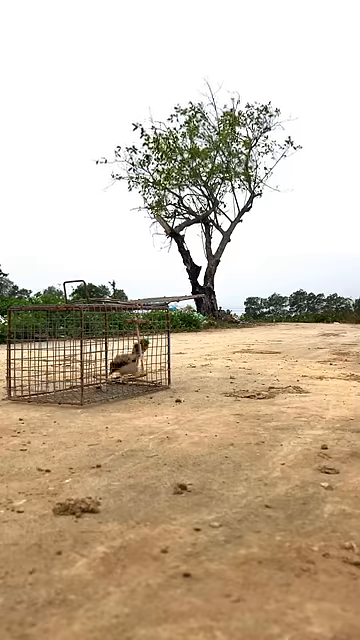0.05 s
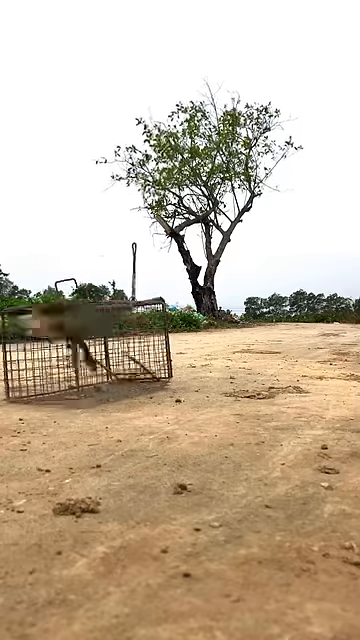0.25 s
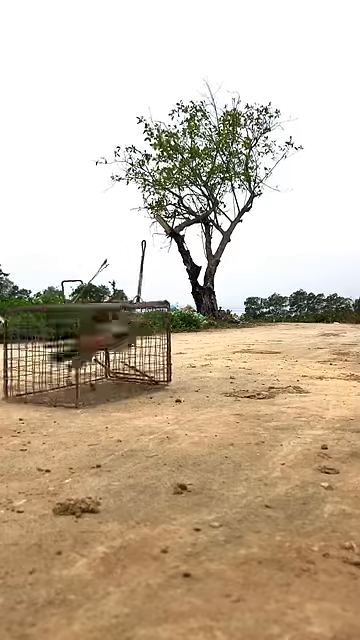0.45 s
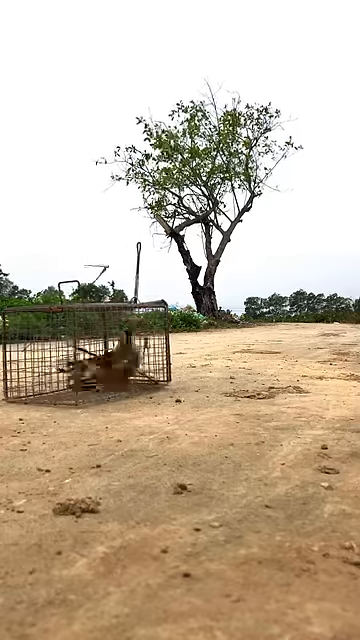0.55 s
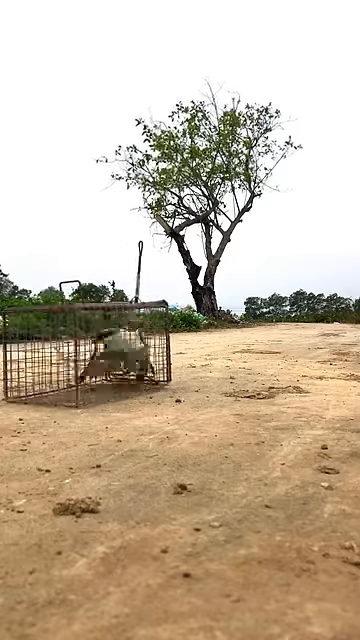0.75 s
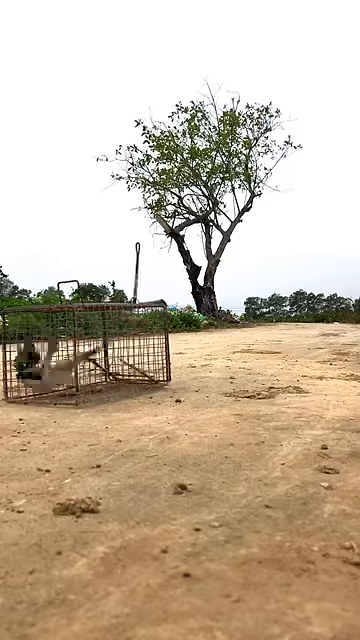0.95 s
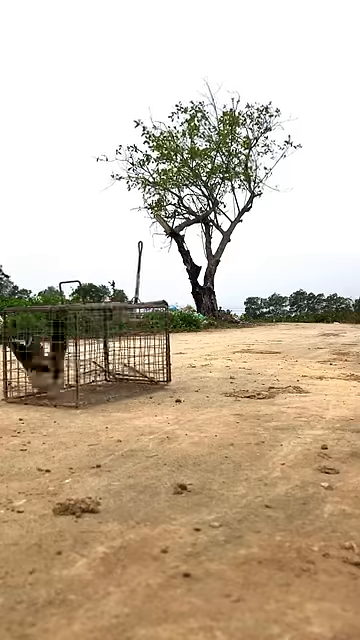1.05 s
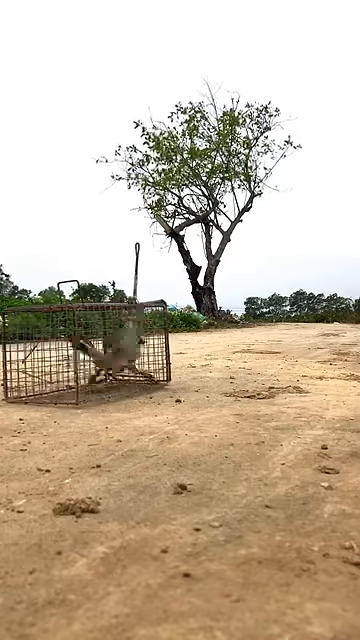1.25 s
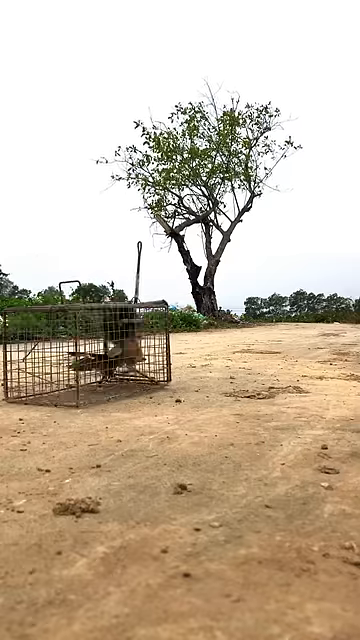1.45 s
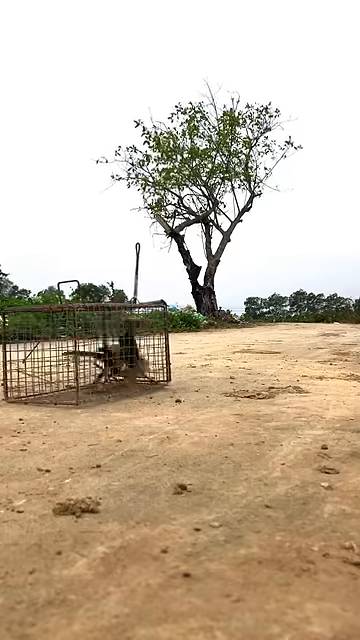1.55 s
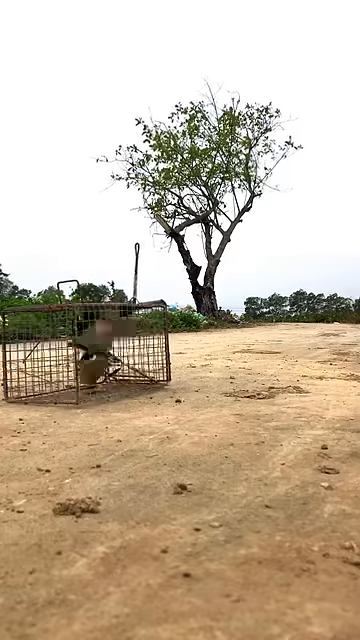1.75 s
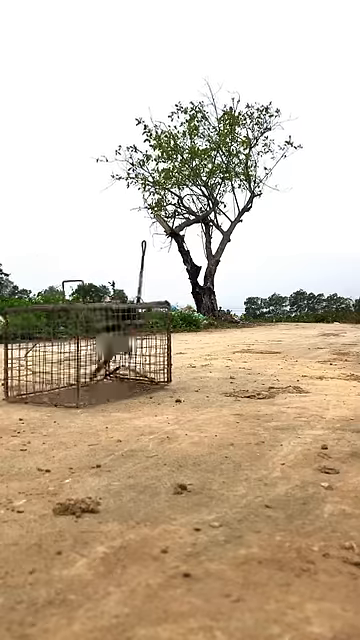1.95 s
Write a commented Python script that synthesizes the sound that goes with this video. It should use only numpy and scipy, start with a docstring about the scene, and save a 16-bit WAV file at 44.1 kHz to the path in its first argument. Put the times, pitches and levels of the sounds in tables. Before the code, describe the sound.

A wire cage trap door slams shut with a sharp metallic clack, then the mesh rattles outdoors

```python
"""Dry ground outdoors: a wire cage trap's latch slips, its door whips down, slams and bounces; a rod and a hook ping.
The caught animal then throws itself at the mesh. Blows and rattle are shaped noise plus mesh modes, pings are
decaying sines with a click, thumps are damped sines. Behind lie noise rumble and hiss, narrow-noise hums and
insects, and faint far tones. The level dips briefly near the start and fades back in."""
import sys
import numpy as np
from scipy import signal
from scipy.fft import rfft, irfft
from scipy.io import wavfile
from scipy.ndimage import uniform_filter1d

SR = 44100
rng = np.random.default_rng(int(sys.argv[2]) if len(sys.argv) > 2 else 0)


def store_pcm(level_fs):
    """Save levels as 16-bit WAV."""
    pcm = np.round(np.clip(level_fs, -1, 1) * 32767).astype(np.int16)
    wavfile.write(sys.argv[1], SR, np.atleast_2d(pcm).T)


N = 88200
T = np.arange(N) / SR
DIP_S = 0.0728
DETUNE = 0.008  # fraction of mode frequency


def amp(db):
    """Amplitude factor of a level in dB."""
    return 10 ** (np.asarray(db) / 20)


def evened(x):
    """Scales to RMS 1."""
    return x / np.sqrt(np.mean(x ** 2) + 1e-20)


def add(mix, start_s, sound):
    """Adds a sound in place, cut at the end of the mix."""
    part = mix[round(start_s * SR):][:len(sound)]
    part += sound[:len(part)]


def colour(x, points):
    """Filters by (frequency [Hz], level [dB]) points, -90 dB outside them, then scales to RMS 1."""
    hz = np.fft.rfftfreq(len(x), 1 / SR)
    point_hz, point_db = np.transpose(points)
    gain_db = np.interp(np.log(hz + 1), np.log(point_hz), point_db, -90, -90)
    return evened(irfft(rfft(x) * amp(gain_db), len(x)))


def band(x, lo_hz, hi_hz):
    """Butterworth band-pass, upper edge kept below Nyquist."""
    sos = signal.butter(3, [lo_hz, min(hi_hz, SR / 2.1)], "band", fs=SR, output="sos")
    return signal.sosfilt(sos, x)


def resonate(x, hz, width_hz):
    """Resonance at a fixed or moving hz: shift to 0 Hz, one-pole low-pass, shift back."""
    turn = np.exp(2j * np.pi * np.cumsum(hz * np.ones(len(x))) / SR)
    pole = np.exp(-np.pi * width_hz / SR)
    return 2 * (turn * signal.lfilter([1 - pole], [1, -pole], x / turn)).real


def ring(modes, extra_db, phase_turns, stretch):
    """Sum of exponentially decaying sines; stretch multiplies the mode frequencies."""
    t = T[:6000, None]
    hz, db, t60_s = np.transpose(modes)
    level = amp(db + extra_db - 60 * t / np.maximum(t60_s, .003))
    return (level * np.sin(2 * np.pi * (hz * stretch * t + phase_turns))).sum(1)


# rumble and hiss spectrum: (frequency [Hz], relative density [dB])
AIR_SPECTRUM = [(25, -38), (45, -1), (70, 0), (140, 2), (220, -10), (450, -11), (1000, -14.5), (2000, -21),
                (2700, -30), (4500, -51), (6500, -33.5), (8800, -35), (10000, -58), (16000, -42)]
# hums: (frequency [Hz], width [Hz], RMS level [dB])
HUM_BANDS = [(79, 5, -66), (104.7, 22, -57.5), (155.6, 9, -57.5)]
# insects: (frequency [Hz], width of each of two passes [Hz], RMS level before throb and late cut [dB])
INSECT_BANDS = [(6620, 340, -77.5), (7850, 400, -88)]
# far tones: (start [s], length [s], from [Hz], to [Hz], RMS waver [Hz], peak level [dB])
FAR_TONES = [(0.835, 0.19, 440.7, 448, 5.7, -54), (1.221, 0.29, 439, 448, 5.8, -66),
             (1.517, 0.223, 2910, 3100, 50, -65), (1.726, .03, 3310, 3450, 55, -72)]
AIR_DB, EARLY_MID_DB = -54, -37
INSECT_PULSE_HZ, INSECT_DEPTH, LATE_INSECT_DB = 24, 0.79, -4.5


def outdoors():
    """Shaped noise for air, resonated noise for hums and pulsing insects, gliding sines for far tones."""
    air_noise, hum_noise, insect_noise, waver_noise = rng.standard_normal((4, N))
    air = amp(AIR_DB) * colour(air_noise, AIR_SPECTRUM)
    mid_sos = signal.butter(2, [550, 3500], "band", fs=SR, output="sos")
    # middle band is quieter before the dip
    air -= (T < DIP_S) * (1 - amp(EARLY_MID_DB)) * signal.sosfiltfilt(mid_sos, air)
    out = air + sum(amp(db) * evened(resonate(hum_noise, hz, width_hz)) for hz, width_hz, db in HUM_BANDS)

    throb = 1 + INSECT_DEPTH * np.sin(2 * np.pi * INSECT_PULSE_HZ * T)
    throb *= amp(LATE_INSECT_DB * (T > DIP_S))
    for hz, width_hz, db in INSECT_BANDS:
        narrow = resonate(resonate(insect_noise, hz, width_hz), hz, width_hz)
        out += throb * amp(db) * evened(narrow)

    slow = evened(uniform_filter1d(uniform_filter1d(waver_noise, size=500), size=500))
    for start_s, length_s, from_hz, to_hz, waver_hz, db in FAR_TONES:
        progress = np.clip((T - start_s) / length_s, 0, 1)
        hz = from_hz + (to_hz - from_hz) * progress + waver_hz * slow
        out += amp(db) * np.sin(np.pi * progress) ** 0.36 * np.sin(2 * np.pi * np.cumsum(hz) / SR)
    return out


# thumps of the cage on the ground: (time [s], frequency [Hz], level at onset before attack [dB])
GROUND_THUMPS = [(0.208, 514, -36), (0.241, 358, -32), (0.446, 310, -36.5), (0.595, 334, -38)]
THUMP_T60_S, THUMP_ATTACK_S = 0.03, 0.0014


def thumps():
    """Dull thud: a quickly damped sine."""
    out, t = np.zeros(N), T[:4000]
    for start_s, hz, db in GROUND_THUMPS:
        level = amp(db - 60 * t / THUMP_T60_S) * np.minimum(t / THUMP_ATTACK_S, 1)
        add(out, start_s, level * np.sin(2 * np.pi * hz * t))
    return out


# mesh modes: (nominal frequency [Hz], relative level [dB], struck t60 [s])
MESH_MODES = [(2200, -1.5, 0.048), (3500, -5.5, .05), (3893, 1, 0.05), (4870, -2, 0.046), (6100, -5, .05),
              (6940, 3, 0.062), (7650, -5, 0.048), (8570, -8, 0.082), (10610, -3.5, 0.1),
              (12640, -2.5, .05), (13200, -4.5, 0.031), (14740, -9, 0.02)]
# frame spectrum: (frequency [Hz], relative density [dB])
FRAME_SPECTRUM = [(450, -22.5), (750, -8.5), (1400, -1.5), (2100, -0.5), (2700, -8.5), (3400, -14.5),
                  (4500, -36)]
# wire spectrum: (frequency [Hz], relative density [dB])
WIRE_SPECTRUM = [(2400, -27), (3000, -8), (4900, 0.5), (6000, 0), (10500, -7.5), (15300, -6), (16500, -15)]
# rattle RMS levels: (time [s], frame [dB], wire [dB], sizzle [dB])
SHAKE_LEVELS = [(0.095, -70, -84, -90.0), (0.144, -69, -79, -79.0), (0.148, -62, -46, -41),
                (0.185, -62, -54, -50), (0.203, -34.5, -44, -45), (0.222, -44.5, -37.5, -34),
                (0.244, -39, -32.5, -29), (0.265, -51.5, -37.5, -35), (0.289, -43.5, -38.5, -35.5),
                (0.33, -47, -42.5, -41.5), (0.385, -45, -48, -44), (0.42, -51.5, -47.5, -48),
                (0.45, -39, -44, -41.5), (0.475, -45.5, -51, -50), (0.499, -59.5, -62, -57),
                (0.51, -43.5, -53, -51), (0.535, -49, -48, -46), (0.578, -51.5, -61, -60.5),
                (0.604, -47.0, -46, -42.5), (0.635, -55.5, -53.5, -53.5), (0.68, -49, -47, -47),
                (0.71, -49.5, -50.5, -54.5), (0.77, -55, -51, -47.5), (0.81, -55, -57.5, -54.5),
                (0.9, -50.5, -53, -50), (0.926, -55.5, -53, -51), (0.93, -46, -43, -38),
                (0.97, -53.5, -52, -49), (1.01, -56, -61, -57), (1.034, -47.5, -50, -53.5),
                (1.059, -45.5, -45.5, -41.5), (1.105, -57.5, -48.5, -45.5), (1.154, -59.5, -52.5, -62),
                (1.189, -62, -62.0, -58), (1.23, -60.5, -64, -71), (1.26, -66, -80.5, -78.5),
                (1.41, -66, -89, -90), (1.47, -58.5, -70.5, -69), (1.499, -50.5, -49, -47.5),
                (1.53, -64, -57.0, -59), (1.55, -61, -57.5, -50.5), (1.62, -67, -62, -57),
                (1.66, -70, -80, -75), (1.78, -66, -72, -79), (1.797, -57, -57.5, -54.5),
                (1.84, -60.5, -55.5, -58.5), (1.9, -63.5, -63, -60.5), (1.94, -61.5, -73.0, -63.5),
                (2.0, -63, -70.0, -80)]
TICKS_PER_S, TICK_SPREAD_DB, TICK_T60_S = 2800, 0.5, 0.013
RATTLE_RING_DB, JANGLE_S = -7, .025


def rattle():
    """Dense wire-on-wire contacts drive frame, wire and mesh modes; each mode jangles on and off."""
    time_s, frame_db, wire_db, sizzle_db = np.transpose(SHAKE_LEVELS)
    ticks = amp(TICK_SPREAD_DB * np.minimum(rng.exponential(1, N), 4))
    ticks *= rng.random(N) < TICKS_PER_S / SR
    envelope = signal.lfilter([1], [1, -amp(-60 / SR / TICK_T60_S)], ticks)
    shake = envelope * rng.standard_normal(N)

    knots_s = np.arange(0, 2.1, JANGLE_S)
    chance = rng.standard_normal((len(MESH_MODES), 2, len(knots_s)))
    detune_step = (T / JANGLE_S).astype(int) // 3  # each detuning lasts three knots
    rung = np.zeros(N)
    for (hz, db, t60_s), (jangle, detune) in zip(MESH_MODES, chance):
        drive = shake * np.clip(np.interp(T, knots_s, jangle), 0, 1)
        mode_hz = hz * (1 + DETUNE * detune)[detune_step]
        rung += amp(db) * evened(resonate(drive, mode_hz, 2.9 / t60_s))

    wire = colour(shake, WIRE_SPECTRUM) + amp(RATTLE_RING_DB) * evened(rung)
    parts = colour(shake, FRAME_SPECTRUM), band(wire, 2580, 8400), band(wire, 8130, 19000)
    levels = frame_db, wire_db, sizzle_db
    return sum(evened(p) * amp(np.interp(T, time_s, db, -110)) for p, db in zip(parts, levels))


# rod modes: (frequency before stretch [Hz], level before tilt [dB], t60 [s])
ROD_MODES = [(4973, -4, 0.039), (5750, -23, .025), (9060, -13, .028), (10560, 0, 0.019), (14000, 2, 0.015),
             (15340, -5, .012)]
# hook modes: (frequency before stretch [Hz], level before tilt [dB], t60 [s])
HOOK_MODES = [(2390, -18.5, 0.073), (5040, -11, 0.045), (5620, -0.5, 0.023)]
# rod pings: (time [s], peak level of tone [dB], tilt [dB per octave])
ROD_STRIKES = [(.2736, -4.5, 6), (.309, -30, -10), (.9205, -35, -6)]
# hook pings: (time [s], peak level of tone [dB], tilt [dB per octave])
HOOK_STRIKES = [(.8292, -25, .1)]
CRACK_DB, PING_STRETCH = -7, 0.99  # crack level re tone peak, before tilt


def pings():
    """Struck steel rod and hook: a band-limited click plus a few short modes."""
    out = np.zeros(N)
    for strikes, modes in ((ROD_STRIKES, ROD_MODES), (HOOK_STRIKES, HOOK_MODES)):
        hz = np.transpose(modes)[0]
        impulse = 1. * (T[:6000] == 0)
        crack = band(impulse, 1.46 * hz.min(), 0.89 * hz.max())
        crack /= abs(crack).max()
        for start_s, peak_db, tilt_db in strikes:
            tone = ring(modes, tilt_db * np.log2(hz / hz[0]), 0, PING_STRETCH)
            tone = band(tone, 0.79 * hz.min(), SR)
            tone /= abs(tone).max()
            add(out, start_s, amp(peak_db) * (tone + amp(CRACK_DB + tilt_db) * crack))
    return out


# blows: (time [s], knock level [dB], knock [Hz], wire level [dB], wire [Hz], sizzle level [dB], burst t60 [s])
# levels scale layers normalized over their first 150 samples; t60 has a 3 ms floor
CAGE_BLOWS = [(0.088, -57, 710, -62, 5730, -60.5, 0.0089), (0.118, -74, 600, -60, 7640, -57, 0.018),
              (0.1285, -66, 620, -60, 8000, -57, 0.012), (0.2044, -43, 1650, -39, 4730, -35, 0.014),
              (0.2067, -28, 1630, -19, 4830, -18, 0.015), (0.2151, -59, 2600, -28, 7400, -19, 0.014),
              (0.225, -37, 2400, -23.5, 3910, -20.5, 0.026), (0.2303, -44, 1790, -24, 7700, -35, 0.0091),
              (0.24, -41, 2150, -25.5, 7660, -24, 0.0066), (0.25, -46, 1480, -32, 7800, -30, 0.017),
              (0.3008, -40, 1600, -47, 4840, -39, 0.017), (0.308, -41.5, 2100, -38.5, 4830, -45, 0.066),
              (0.3603, -44.5, 2120, -41, 6100, -36, 0.063), (0.4341, -40, 1070, -43, 7650, -52, 0.066),
              (0.4436, -36, 1410, -36.5, 4240, -41, 0.016), (0.4542, -36, 1290, -65, 6960, -43, 0.0084),
              (0.4572, -36, 1870, -34.5, 5260, -39, 0.008), (0.4616, -45, 1480, -44.5, 5700, -43, 0.02),
              (0.4696, -64, 2110, -43, 3660, -54, 0.042), (0.5138, -42, 1920, -38, 4300, -37.5, 0.03),
              (0.5205, -36.5, 1910, -44, 4800, -37, 0.013), (0.5297, -46.5, 980, -50, 4610, -44, 0.037),
              (0.5693, -44, 920, -50, 5360, -58, 0.014), (0.583, -49, 980, -55, 5620, -53, 0.02),
              (0.5918, -36, 2460, -33, 7140, -34.5, 0.012), (0.5919, -31, 870, -54, 3670, -43, 0.029),
              (0.5983, -43, 1800, -42, 4870, -38, 0.014), (0.6157, -51, 1890, -42.5, 5940, -52, 0.02),
              (0.62, -53, 2170, -42.5, 4770, -49, 0.015), (0.6393, -62, 2120, -50, 6180, -57, 0.019),
              (0.6685, -47, 1880, -50, 5860, -48, 0.021), (0.6858, -44.5, 2070, -31.5, 7950, -28.5, 0.038),
              (0.6952, -46, 1800, -39, 5200, -52, 0.014), (0.726, -51.5, 2000, -44, 4940, -53, 0.054),
              (0.8855, -44, 735, -67, 5210, -45, 0.016), (0.929, -48, 2200, -41.5, 6900, -47, 0.03),
              (0.9496, -46, 1250, -45, 6500, -48, 0.043), (1.039, -40.5, 1930, -51, 4560, -56, 0.013),
              (1.049, -51, 1410, -37.5, 3970, -36.5, 0.017), (1.059, -44, 1380, -49, 4700, -50, 0.012),
              (1.0625, -60, 1510, -41, 4500, -53, 0.006), (1.0766, -57, 1640, -40, 3420, -54, 0.013),
              (1.0862, -56, 1800, -48, 4160, -55, 0.011), (1.13, -47.5, 1760, -47, 5400, -43, 0.034),
              (1.1457, -65, 1790, -42, 5270, -49, 0.025), (1.1578, -74, 1800, -51, 5300, -66, 0.015),
              (1.182, -77, 1420, -54.5, 5270, -64, 0.013), (1.238, -70, 1980, -55.5, 4870, -50, 0.018),
              (1.4787, -54.5, 1150, -64, 3160, -74, 0.039), (1.4887, -41.5, 1220, -44, 6740, -59, 0.023),
              (1.4992, -42.5, 1820, -39.5, 7030, -44.5, 0.015), (1.5073, -49, 1170, -46, 8150, -56, 0.02),
              (1.514, -50, 1870, -59, 4170, -57, 0.023), (1.539, -62, 1790, -49.5, 6850, -44.5, 0.046),
              (1.6073, -60.5, 610, -59, 8280, -53, 0.023), (1.7924, -67, 1250, -54.5, 4600, -55.5, 0.013),
              (1.809, -66, 940, -56, 8300, -49, 0.016), (1.878, -78, 830, -55, 6550, -49.5, 0.071),
              (1.9536, -58, 623, -65, 6960, -58, 0.024)]
RISE_S, CLICK_AMP = .0011, 3.8
RING_DB, RING_SPREAD_DB, RING_OCTAVES = -13.5, 9, 0.083


def onset_evened(x):
    """Scales to RMS 1 over the first 150 samples."""
    return x / np.sqrt(np.mean(x[:150] ** 2))


def blows():
    """A noise burst with a click drives knock, wire clack and sizzle; mesh modes near the wire pitch ring."""
    out, t = np.zeros(N), T[:6000]
    mesh_hz = np.transpose(MESH_MODES)[0]
    noises = rng.standard_normal((len(CAGE_BLOWS), 6000))
    chances = rng.random((len(CAGE_BLOWS), 3, len(MESH_MODES)))
    rise = np.minimum(t / RISE_S, 1) ** 2
    click = CLICK_AMP * (np.arange(len(t)) == round(RISE_S * SR))
    for blow, noise, (level_chance, phase_turns, detune_chance) in zip(CAGE_BLOWS, noises, chances):
        start_s, knock_db, knock_hz, wire_db, wire_hz, sizzle_db, t60_s = blow
        t60_s = max(t60_s, .003)
        burst = noise * rise * amp(-60 * t / t60_s) + click

        knock = onset_evened(resonate(resonate(burst, knock_hz, 510), knock_hz, 510))
        knock += 0.47 * onset_evened(band(burst, 375, 4200))
        wire = 0.7 * onset_evened(resonate(burst, wire_hz, 280))
        wire += 0.6 * onset_evened(band(burst, 3380, 8500))
        # sizzle decays faster than the burst
        sizzle = onset_evened(band(burst * amp(-20 * t / t60_s), 8500, 16400))

        octaves_off = np.log2(mesh_hz / wire_hz)
        near = amp(wire_db - 2 * (octaves_off / RING_OCTAVES) ** 2)
        near += amp(sizzle_db) * (mesh_hz > 8000)
        mode_db = RING_DB + 20 * np.log10(near + 1e-9) + RING_SPREAD_DB * (2 * level_chance - 1)
        modes = rise * ring(MESH_MODES, mode_db, phase_turns, 1 + DETUNE * (2 * detune_chance - 1))
        add(out, start_s, amp(knock_db) * knock + amp(wire_db) * wire + amp(sizzle_db) * sizzle + modes)
    return out


def scene():
    """Sums all layers to one channel."""
    return (outdoors() + thumps() + rattle() + pings() + blows())[None]


FADE_OUT_S, FADE_IN_S, EDGE_HZ = 0.0024, 0.03, 16000


def record(dry):
    """Brief level dip with a fade back in, then a low-pass."""
    before = np.clip((DIP_S - T) / FADE_OUT_S, 0, 1)
    after = np.clip((T - DIP_S) / FADE_IN_S, .01, 1) ** 0.95  # floor about -38 dB
    lowpass = signal.firwin(191, EDGE_HZ, window=("kaiser", 9), fs=SR)
    return signal.oaconvolve(dry * np.maximum(before, after), lowpass[None], "same")


dry = scene()
out = record(dry)
store_pcm(out)
```